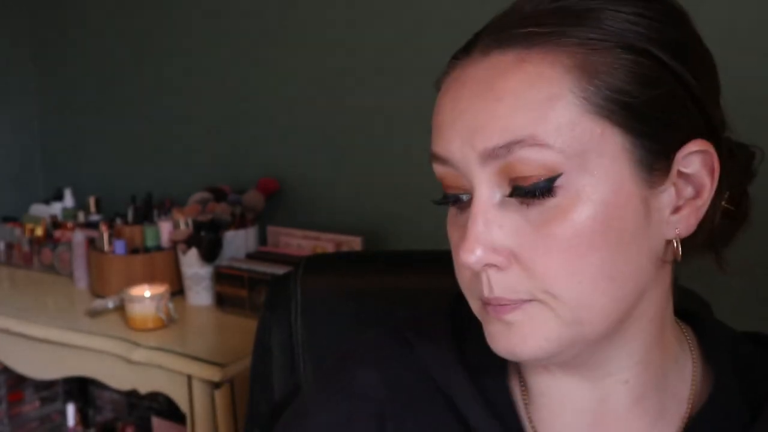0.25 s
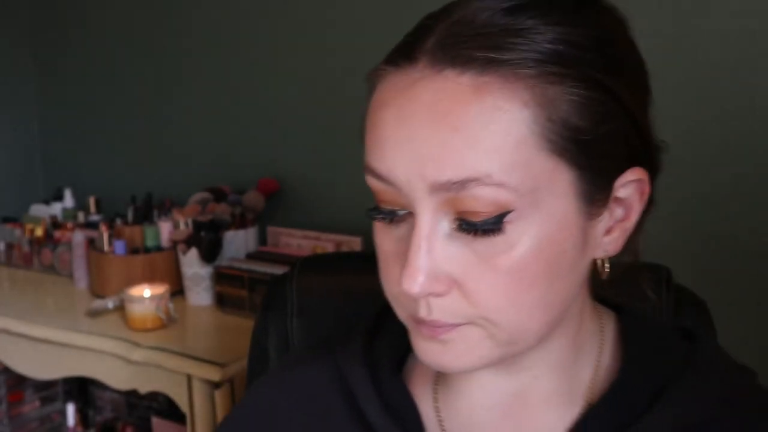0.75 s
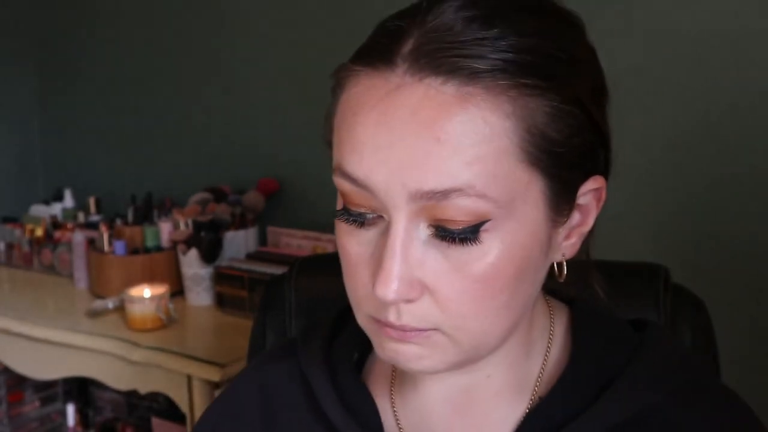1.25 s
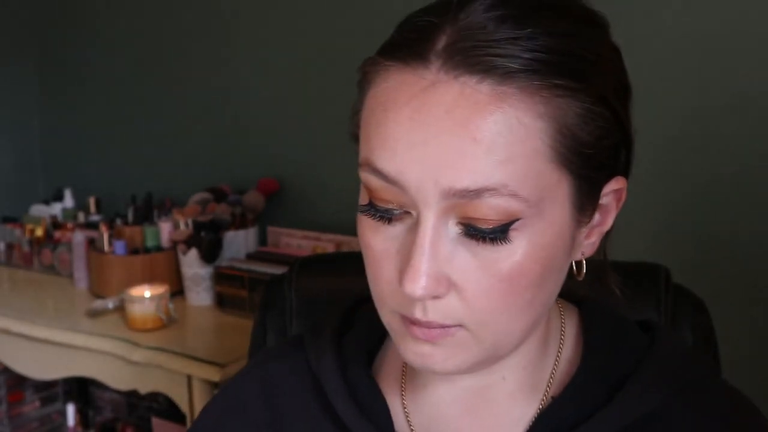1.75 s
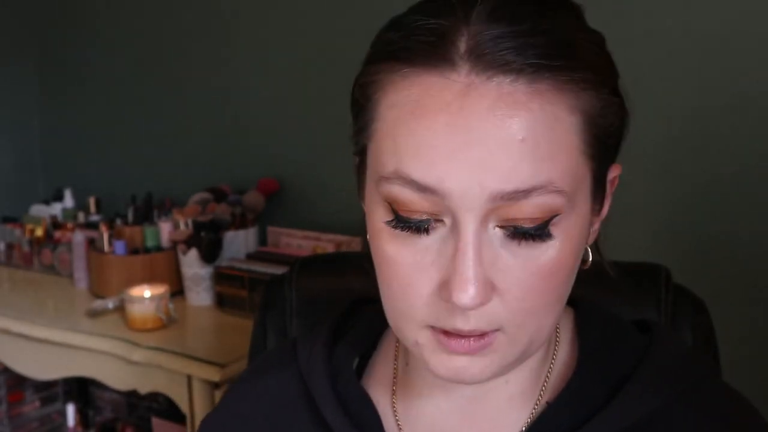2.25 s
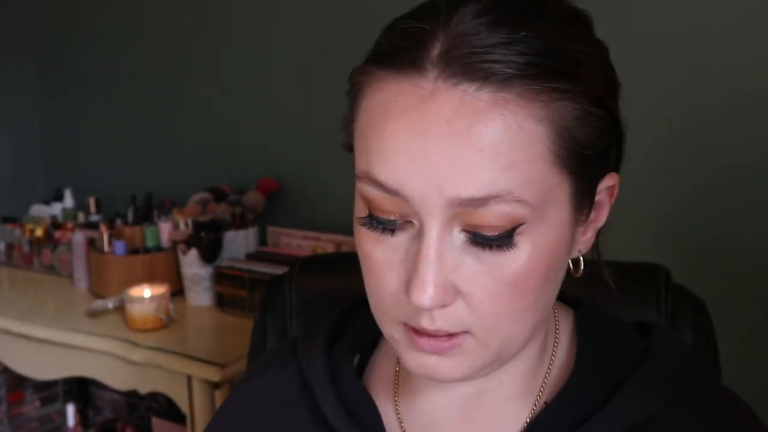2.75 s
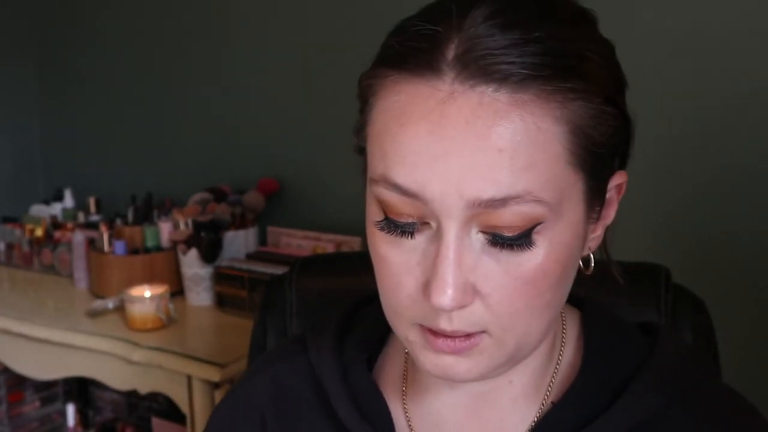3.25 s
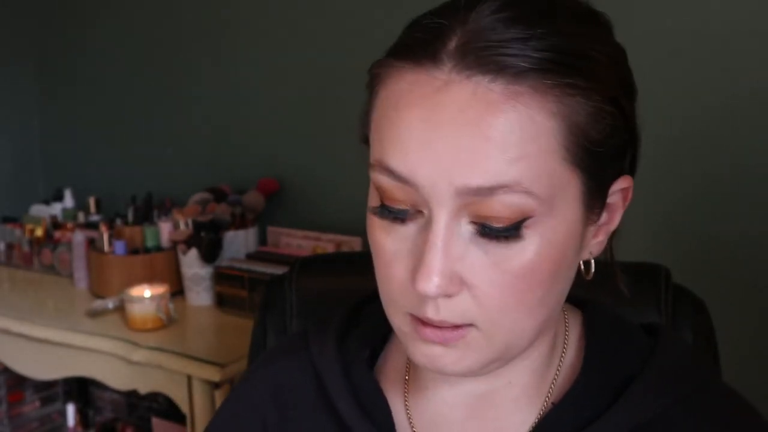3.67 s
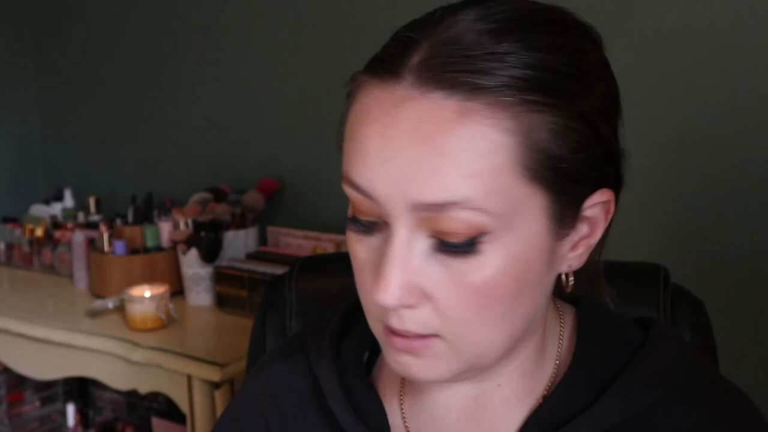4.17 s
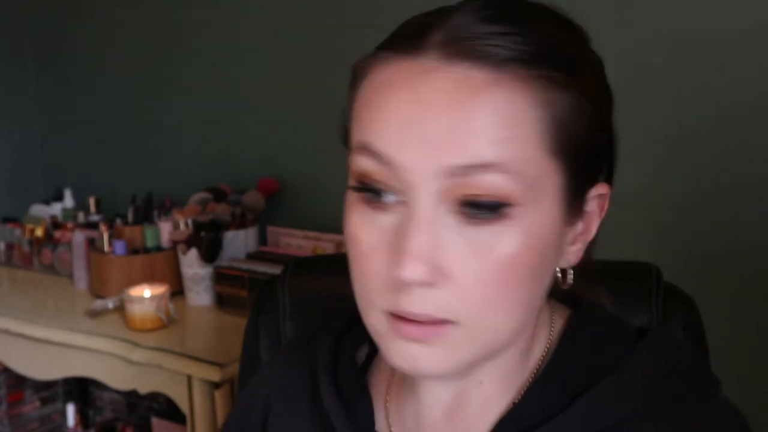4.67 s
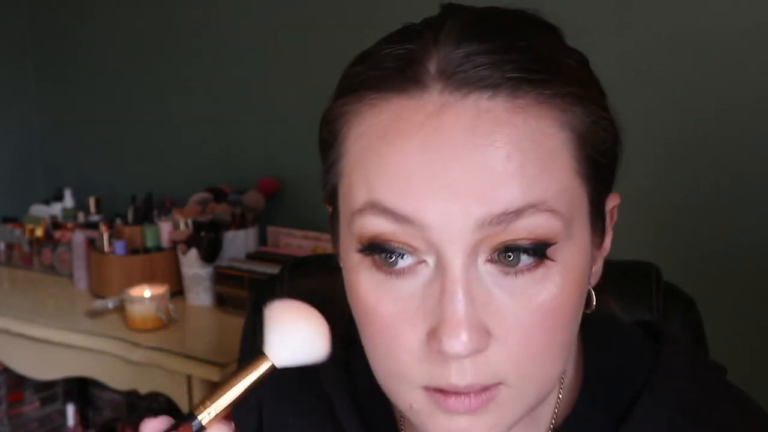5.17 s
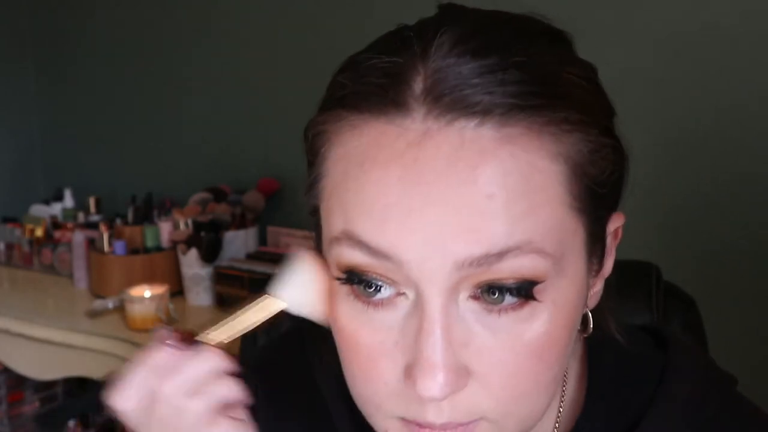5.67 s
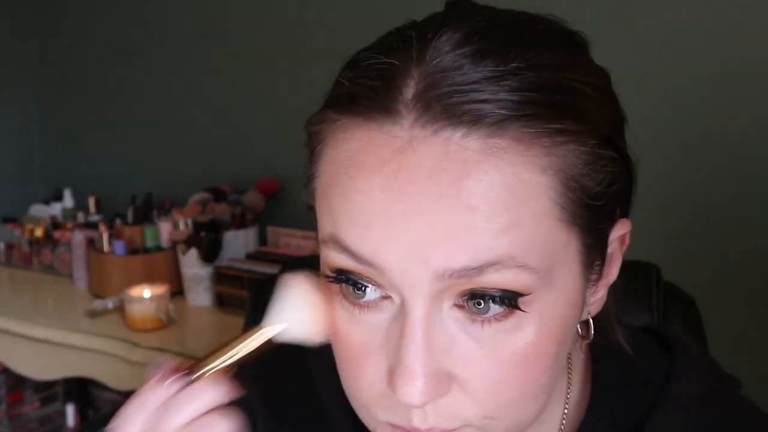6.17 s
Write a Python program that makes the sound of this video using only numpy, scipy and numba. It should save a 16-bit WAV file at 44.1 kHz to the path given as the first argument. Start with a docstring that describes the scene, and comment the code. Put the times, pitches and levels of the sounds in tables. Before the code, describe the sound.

A drawer bumps shut, plastic make-up cases scrape and clatter in a box, one knocks hard on the table, later a compact clacks twice.

```python
"""Small, bare-walled room: someone rummages for make-up beside a camera with two close microphone ports.
A drawer slides shut, plastic cases scrape and clatter in a box, one knocks hard on the table, a compact clacks twice;
then a padded chair shifts, a sleeve rustles among faint squeaks and a brush taps.
Contacts are force bursts and streams of tiny clicks through body resonances, each followed by a diffuse room tail.
Gain control ducks everything, hiss and low hum included, after loud knocks."""
import sys
import numpy as np
from scipy import signal
from scipy.fft import rfft, irfft
from scipy.io import wavfile
from scipy.ndimage import uniform_filter1d, map_coordinates
from numba import njit

SR = 44100
rng = np.random.default_rng(int(sys.argv[2]) if len(sys.argv) > 2 else 0)


def pcm_store(signal):
    """Save signal as 16-bit PCM."""
    levels = np.round(np.clip(np.atleast_2d(signal), -1, 1) * 32767)
    wavfile.write(sys.argv[1], SR, levels.astype(np.int16).T)


N = 283122
SIZE = 32768  # samples per short sound and per impulse response
FREQS = np.maximum(np.arange(SIZE // 2 + 1) * SR / SIZE, 1)
TIME = np.arange(N) / SR
FADE = signal.windows.tukey(2 * SIZE)[SIZE:]
STROKE_LEAD_S = .15
TOP_HZ = 16000

# Steady background spectra: [f/Hz, density/dB], each scaled to its rms level below
AIR = [(15, -47.5), (25, -15.5), (59, -5), (90, -6), (118, -1.5), (146, -3), (438, -8.5), (529, -11),
       (1180, -13.5), (1350, -14.5), (1760, -15.5), (10300, -34), (15000, -60.5)]
HISS_SIDE = [(15, -46.5), (25, -20), (158, -1), (415, 0.5), (488, -2), (558, -3), (673, -2), (3630, -12),
             (8320, -22), (15000, -34)]
AIR_DB, HISS_SIDE_DB, HUM_HZ, HUM_DB = -53.5, -51.5, 122, -60.5
# Microphone response: [f/Hz, gain/dB]
MICROPHONE = [(30, -6.5), (90, 3.5), (11500, -0.5), (12700, -4.5), (13700, -26.5), (16000, -49)]
# Room decay by 60 dB: [f/Hz, time/s]
ROOM_T60 = [(130, 0.46), (260, .52), (510, 0.59), (1020, 0.67), (2050, 0.69), (4100, 0.64), (8200, 0.52),
            (12000, 0.22)]
# Room width: [f/Hz, side over mid/dB]
ROOM_SIDE = [(100, -34), (400, -21.5), (1000, -14), (2200, -12.5), (4000, -2.5), (8000, 3.5), (12000, 5.5),
             (15000, 19.5)]

# Drawer jolts on its runner and hits its stop: [t/s, level/dB, treble/dB, rattle/s]
DRAWER_BUMPS = [(.002, -34, -7, 0.011), (0.046, -35.5, -27, 0.00072), (.103, -19.5, -4.5, 0.0031),
                (.116, -24, 17.5, 0.011)]
# Drawer pushed along its runner: [t/s, level/dB, length/s]
DRAWER_PUSHES = [(0.0011, -29.5, 0.21)]
# Padded chair shifts: [t/s, level/dB, bass/dB, treble/dB]
SOFT_BUMPS = [(4.948, -37, 3, -1), (4.987, -47, 17, -2), (5.115, -49, 3, -6)]
# Brush taps: [t/s, level/dB]
BRUSH_TAPS = [(6.06, -64), (6.302, -64.5)]
# Sleeve brushes by as the arm moves: [t/s, level/dB, length/s]
SLEEVE_SWEEPS = [(5.124, -53.5, 0.03), (5.19, -58.5, 0.077), (5.32, -62.5, .05), (5.48, -56.5, 0.016)]
# Faint rubbing squeaks: [t/s, level/dB, length/s, first f/Hz, last f/Hz, octave above over note/dB]
SQUEAKS = [(4.234, -55, .045, 3885, 3620, -26), (4.424, -53, .03, 3840, 3700, -18),
           (4.953, -59, 0.037, 3870, 3720, -26), (5.112, -56, 0.038, 2000, 2380, -14),
           (5.13, -57, 0.029, 1676, 1850, -10), (5.123, -65, .05, 4560, 4680, -30),
           (5.192, -58, 0.054, 2110, 1830, -21), (5.27, -63, 0.08, 2820, 2920, -16),
           (5.332, -65, 0.045, 1970, 1680, -14), (5.467, -56.5, 0.041, 1720, 2087, -8)]
# Compact scuffs as it is shifted: [t/s, level/dB, rattle/s]
COMPACT_SCUFFS = [(.608, -38, 0.032), (4.213, -46.5, 0.016), (4.2621, -39.5, 0.0034),
                  (4.272, -47.5, 0.0066), (4.298, -45, 0.0036)]
# Compact clacks: [t/s, level/dB, bass/dB, treble/dB, free ring (scales mode dB)]
COMPACT_CLACKS = [(4.4597, -24.5, 7.5, 17.5, 1.016), (4.6226, -26, 1.5, 13.5, 0.83)]
# Nearby surfaces return the clacks: [delay/s, level/dB]
SLAPS = [(.0155, -19), (.031, -8.5)]
# Hand shoves the cases and covers more or less of the box:
# [t/s, level/dB, length/s, hollow f/Hz, hollow gain/dB, rubbed case f/Hz]
CASE_SHOVES = [(0.785, -43, .08, 925, 11.5, 3550), (0.905, -20.5, 0.042, 916, 15, 2730),
               (1.067, -28.5, 0.038, 830, 11.5, 4700), (1.175, -17.5, 0.022, 890, 10, 2020),
               (1.288, -25.5, 0.012, 914, 21, 3970), (1.403, -38.5, 0.072, 960, 6.5, 2880),
               (1.678, -23, 0.04, 915, 15.5, 2920), (1.76, -28, 0.031, 865, 11, 3520),
               (1.822, -31, .05, 900, 25, 3100)]
# Cases clatter: [t/s, level/dB, bass/dB, treble/dB, rattle/s, free ring (0 damped, 1 normal), struck case f/Hz]
CASE_CLACKS = [(0.76, -38.5, -10, -6.5, 0.012, 0.73, 3550), (.895, -20.5, -0.5, 9, 0.04, 0.46, 3680),
               (.975, -25.5, 14, 3, 0.0043, 1, 2750), (1.056, -19, 1.5, 11.5, 0.017, 0.73, 3450),
               (1.153, -16.5, -1, 2, 0.037, 0.59, 2810), (1.586, -29, -18, -3, 0.0029, 0.44, 2450),
               (1.613, -19.5, 2.5, -1, 0.035, 0.86, 2840), (1.663, -16, -2.5, 0, 0.0055, 1.57, 2980),
               (1.744, -24, -5, 1.5, 0.0081, 0.75, 1750)]
# Tube clicks against the cases: [t/s, level/dB, rattle/s]
TUBE_CLICKS = [(.897, -41.5, .004), (1.154, -24.5, 0.018), (1.664, -29.5, 0.003)]
# Small caps tick: [t/s, level/dB, treble/dB, free ring (scales mode dB)]
CAP_TICKS = [(2.303, -55.5, 36, 0.11), (2.4542, -44, -1.5, 0.83), (4.231, -55, -18, 0.64)]
# Short snaps and hollow knocks in a narrow band, some close, some roomy:
# [t/s, level/dB, centre f/Hz, direct over room send/dB]
SNAPS = [(0.012, -39, 2130, -7), (0.0455, -33.5, 1340, 0), (0.1006, -29.5, 3140, -5.5),
         (0.123, -46, 2520, 5), (.737, -68, 9600, -4), (0.935, -43, 4800, -1), (0.991, -44.5, 3000, 4.5),
         (1.064, -44, 4400, 4), (1.1535, -33.5, 2400, -2), (1.182, -42, 3400, 7), (1.219, -38.5, 3000, 4.5),
         (1.404, -54.5, 9000, 6.5), (1.587, -34, 2400, -0.5), (1.614, -36.5, 3300, 5),
         (1.6645, -27.5, 900, 2.5), (1.6643, -33, 2950, 4.5), (1.744, -33, 3600, 2),
         (1.8801, -23.5, 1480, 18.5), (2.4476, -64, 2590, 12), (2.83, -64.5, 2000, 0),
         (4.4592, -46.5, 10400, -2), (4.4592, -33, 1350, -1.5), (4.622, -48.5, 10000, -4),
         (4.6221, -37, 1100, -4)]
# Case put down on the table:
# [t/s, level/dB, treble/dB, rattle/s, direct over room send/dB, free ring (scales mode dB)]
TABLE_KNOCKS = [(1.057, -22, -20, 0.017, -3.5, .27), (1.880, -6, -6.5, 0.0033, 6, 0.78)]

# Stroke envelopes: (rise/(dB/s), sag while it lasts/(dB/s), fall/(dB/s))
PUSH_SHAPE = (600, 43, 420)
SHOVE_SHAPE = (360, 52, 730)
SWEEP_SHAPE = (200, 47, 240)
SQUEAK_SHAPE = (1300, 39, 980)

# Bodies: broad colour [f/Hz, gain/dB], then modes [f/Hz, width/Hz, gain over colour/dB at free ring 1]
DRAWER_RUNNER = ([(40, -12.5), (200, 3.5), (600, -25.5), (1300, 3.5), (2300, 7.5), (4000, -4.5),
                 (11000, -29)], [(172, 87, 7.9), (240, 40, 4), (1670, 65, 1.9), (1872, 140, 7.9)])
DRAWER = ([(40, 3), (110, 9.5), (300, -4.5), (1000, 5.5), (2800, -4.5), (5000, -8), (11000, -20.5)],
          [(172.7, 14, 18), (240.7, 25, 6), (375.6, 45, 14), (580, 36, 9), (779, 28, 7.5), (1622, 125, 9),
          (1960, 56, 11)])
PADDED = ([(40, -3), (110, 8), (220, -1.5), (500, 4), (1200, -3.5), (2500, -8), (5000, -23.5),
          (11000, -30.5)], [(497, 29, 3.1), (2050, 140, 3.8), (3720, 310, 12)])
BRUSH = ([(100, -19), (450, 12), (900, 4), (1400, -15), (5000, -28)], [(470, 106, 7.5), (855, 65, 18)])
SLEEVE = ([(100, -9), (600, -3), (1200, -8), (2000, 6), (3300, -4), (6000, -14), (12000, -31)],
          [(1820, 360, 8.9), (4560, 210, 5)])
SCUFF = ([(60, -7.5), (270, 7.5), (1100, 4.5), (2400, -0.5), (2900, -8), (7000, -24), (11000, -44.5)],
         [(1100, 310, 5.5), (1720, 200, 9.3), (2300, 110, 5.8)])
COMPACT = ([(60, -5), (170, -20), (270, 3), (800, 4.5), (1300, 7), (1800, 5), (2600, -3.5), (4000, -15),
           (7000, -23), (11000, -21)], [(484, 70, 4.9), (564, 117, 19.6), (670, 130, 4.4), (866, 120, 5),
           (1130, 83, 4), (1196, 85, 9.5), (1350, 100, 7.1), (2040, 120, 1.8), (3860, 114, 5.1)])
CASES = ([(40, -25), (85, -7), (130, 5.5), (270, -3.5), (600, -2), (1300, -3), (3000, 2.5), (5000, -2),
         (7500, -6.5), (11500, -12)], [(167.7, 11, 12.3), (345, 27, 5.6), (836, 107, 6.1), (1790, 68, 7),
         (3270, 87, 4), (3550, 110, 5.6), (4900, 77, 4)])
TUBE = ([(200, -16), (1000, -13), (1900, -2.5), (3200, -8), (5000, -5), (11000, -20)], [(2000, 620, 15),
        (2950, 260, 21)])
CAP = ([(100, -22), (1000, -1.5), (2000, 2.5), (4000, 0.5), (7000, -5), (11000, -12)], [(3700, 280, 15.6),
       (3950, 340, 10.2)])
TABLE = ([(40, -27), (130, -7), (250, -7.5), (450, 0), (700, 5), (1250, -4), (2200, 0), (3000, 0),
         (5000, -4), (11000, -18.5)], [(568, 17, 10.5), (636.6, 39, 4.2), (896, 140, 12), (1480, 170, 2.4),
         (1660, 240, 14), (3100, 170, 10), (3930, 110, 3.8)])
# Air in the box, as one mode: (f/Hz, width/Hz, gain/dB)
HOLLOW = (936, 77, 16.8)
# Ring of a single case: (width/Hz, gain/dB)
CASE_NOTE = (110, 9.1)


def undb(db):
    """Decibels to gain."""
    return 10 ** (np.asarray(db) / 20)


def along(points, hz):
    """Read (Hz, value) points on a log-frequency axis."""
    at_hz, value = np.transpose(points)
    return np.interp(np.log(hz), np.log(at_hz), value)


def unit(x):
    """Scale to an rms of one."""
    return x / np.sqrt(np.mean(x ** 2))


def causal(gain):
    """Minimum-phase response with the given gain, by folding the cepstrum."""
    cepstrum = irfft(np.log(gain))
    cepstrum[1:SIZE // 2] *= 2
    cepstrum[SIZE // 2 + 1:] = 0
    return np.exp(rfft(cepstrum))


def colour(points):
    """Minimum-phase response through (Hz, dB) points."""
    return causal(undb(along(points, FREQS)))


def impulse(response):
    """Impulse response, faded to silence at its end."""
    return irfft(response) * FADE


def through(x, response):
    """Pass a sound through a frequency response."""
    return signal.oaconvolve(x, impulse(response))[:len(x)]


def uncoloured(burst, size):
    """Burst spectrum levelled over `size` bins: keeps its scatter in time, loses its own tone."""
    spectrum = rfft(burst)
    power = uniform_filter1d(abs(spectrum) ** 2, size)
    return spectrum * causal(np.maximum(power, 1e-12) ** -.5)


def resonate(body, ring=1):
    """Body response: broad colour lifted by each mode as far as the grip lets it ring."""
    points, modes = body
    response = colour(points)
    for hz, width_hz, gain_db in modes:
        detune = (FREQS / hz - hz / FREQS) * hz / width_hz
        response = response * (1 + (undb(ring * gain_db) - 1) / (1 + 1j * detune))
    return response


def grains(size, per_s=2500, spread_db=3):
    """Tiny contacts at random moments, a few much stronger than the rest."""
    touch = rng.random(size) < per_s / SR
    sign = rng.choice([-1, 1], size)
    strength = undb(spread_db * np.minimum(rng.exponential(size=size), 4))
    return unit(touch * sign * strength)


def wander(span_s):
    """Smooth chance, rms one, that changes about once per span."""
    span = max(int(span_s * SR), 1)
    smooth = uniform_filter1d(rng.standard_normal(SIZE), span, mode="wrap")
    return unit(uniform_filter1d(smooth, span, mode="wrap"))


def place(sound, t_s, direct_db):
    """Start a short sound at its moment; rows: direct sound, room send."""
    out, start = np.zeros(N + 2 * SIZE), SIZE + int(t_s * SR)
    out[start:start + SIZE] = sound
    return np.outer([undb(direct_db), 1], out[SIZE:SIZE + N])


def knock(body, t_s, level_db, rattle_s, direct_db, bass_db=0, treble_db=0, ring=1, contact_s=0.0016,
          rattle_gain=0.094, bass_hz=200, middle_hz=900, treble_hz=5000):
    """One blow: a short noisy contact and a decaying rattle ring the body."""
    t = TIME[:SIZE]
    crack = rng.standard_normal(SIZE) * np.exp(-t / contact_s)  # edges do not land all at once
    rattle = rattle_gain * grains(SIZE) * np.exp(-t / max(rattle_s, 1 / SR))
    force = crack / np.linalg.norm(crack) + rattle
    # heavy blow: more bass; hard blow: more treble
    touch = colour([(bass_hz, bass_db), (middle_hz / 2, 0), (middle_hz, 0), (treble_hz, treble_db)])
    hit = impulse(uncoloured(force, size=90) * resonate(body, ring) * touch)
    hit *= undb(level_db) * np.sqrt(SR / 20 / np.sum(hit ** 2))  # level over 50 ms
    return place(hit, t_s, direct_db)


def stroke(level_db, length_s, shape):
    """Effort of one hand movement: rises to its level, sags while it lasts, falls away."""
    rise, sag, fall = shape
    t = TIME[:SIZE] - STROKE_LEAD_S
    drop_db = rise * np.maximum(-t, 0) + sag * np.clip(t, 0, length_s) + fall * np.maximum(t - length_s, 0)
    return undb(level_db - drop_db)


def slide(body, t_s, level_db, length_s, shape, per_s, spread_db, direct_db, jerk_db, drift):
    """Jerky stroke: dense catch-and-slip clicks ring the body; pitch drifts as the grip shifts."""
    response = resonate(body)
    response = response / np.sqrt(np.mean(abs(response) ** 2))
    jerks = unit(undb(jerk_db * wander(span_s=0.018)))
    effort = stroke(level_db, length_s, shape) * jerks
    scrape = through(effort * grains(SIZE, per_s, spread_db), response)
    # pitch drift by a wandering read position, pinned at the stroke's start
    slip = np.cumsum(drift * wander(span_s=0.0236))
    read_at = np.arange(SIZE) + slip - slip[int(STROKE_LEAD_S * SR)]
    scrape = map_coordinates(scrape, [read_at])
    return place(scrape, t_s - STROKE_LEAD_S, direct_db)


def background():
    """Room air and a low hum in mid, microphone hiss in side: shaped noise and a sine."""
    air = undb(AIR_DB) * unit(through(rng.standard_normal(N), colour(AIR)))
    hiss = undb(HISS_SIDE_DB) * unit(through(rng.standard_normal(N), colour(HISS_SIDE)))
    hum = undb(HUM_DB) * unit(np.sin(2 * np.pi * HUM_HZ * TIME))
    return np.array([air + hum, hiss])


def room_tail(early_db, build_s=0.0027, early_s=0.056):
    """Wall reflections: strong early, then a diffuse tail with its own decay in each octave."""
    t, noise, tail = TIME[:SIZE], rfft(rng.standard_normal(SIZE)), 0
    octave = np.round(np.log2(np.maximum(FREQS, 100)))
    for k in np.unique(octave):
        decay = np.exp(-np.log(1000) * t / along(ROOM_T60, 2 ** k))
        tail = tail + irfft(noise * (octave == k)) * decay
    build = 1 - np.exp(-(t / build_s) ** 2)
    early = undb(early_db * np.exp(-t / early_s))
    return uncoloured(tail * build * early, size=24)


def room(source, gap_s, early_db, port_lag_samples=1.36):
    """One place in the room as mid and side: the ports share the bass and differ in the treble."""
    direct, send = source
    late = np.pad(send, (int(abs(gap_s) * SR), 0))[:N]  # first reflection has further to go
    mid = direct + through(late, room_tail(early_db))
    side_tail = through(late, room_tail(early_db) * colour(ROOM_SIDE))
    side = port_lag_samples * np.gradient(direct) + side_tail
    return np.array([mid, side])


def squeak(t_s, level_db, length_s, first_hz, last_hz, octave_db, waver=0.0213, direct_db=-1.0):
    """Fast stick-slip: a rough, gliding note with its octave."""
    glide_hz = np.interp(TIME[:SIZE] - STROKE_LEAD_S, [0, length_s], [first_hz, last_hz])
    phase = 2 * np.pi * np.cumsum(glide_hz * (1 + waver * wander(span_s=.0015))) / SR
    note = unit(np.sin(phase) + undb(octave_db) * np.sin(2 * phase))
    return place(note * stroke(level_db, length_s, SQUEAK_SHAPE), t_s - STROKE_LEAD_S, direct_db)


def seat():
    """Padded thumps of the chair, sleeve friction, stick-slip squeaks and soft brush taps."""
    chair = sum(knock(PADDED, t_s, level_db, rattle_s=0.06, direct_db=-6.5, bass_db=bass_db,
                      treble_db=treble_db, ring=0.31)
                for t_s, level_db, bass_db, treble_db in SOFT_BUMPS)
    brush = sum(knock(BRUSH, t_s, level_db, rattle_s=0.0088, direct_db=5.5) for t_s, level_db in BRUSH_TAPS)
    sleeve = sum(slide(SLEEVE, *sweep, SWEEP_SHAPE, per_s=860, spread_db=4.5, direct_db=5.0,
                       jerk_db=2.0, drift=.06)
                 for sweep in SLEEVE_SWEEPS)
    squeaks = sum(squeak(*row) for row in SQUEAKS)
    return chair + brush + sleeve + squeaks


def drawer():
    """Drawer scrapes along its runner and its body rings as it bumps shut."""
    bumps = sum(knock(DRAWER, t_s, level_db, rattle_s, direct_db=-5.0, bass_db=0.5,
                      treble_db=treble_db, ring=1.0, rattle_gain=0.16)
                for t_s, level_db, treble_db, rattle_s in DRAWER_BUMPS)
    pushes = sum(slide(DRAWER_RUNNER, *push, PUSH_SHAPE, per_s=470, spread_db=3.0, direct_db=0,
                       jerk_db=2.0, drift=.01)
                 for push in DRAWER_PUSHES)
    return bumps + pushes


def compact():
    """Compact scuffs dully while held; its clacks ring and nearby surfaces answer."""
    scuffs = sum(knock(SCUFF, t_s, level_db, rattle_s, direct_db=-7.0, contact_s=0.0034)
                 for t_s, level_db, rattle_s in COMPACT_SCUFFS)
    clacks = sum(knock(COMPACT, t_s, level_db, rattle_s=0.0051, direct_db=-6.5, bass_db=bass_db,
                       treble_db=treble_db, ring=ring, contact_s=0.0029)
                 for t_s, level_db, bass_db, treble_db, ring in COMPACT_CLACKS)
    slaps = sum(undb(level_db) * np.roll(clacks, int(delay_s * SR), axis=1) for delay_s, level_db in SLAPS)
    return scuffs + clacks + slaps


def snaps(skirt_db=-24, top_db=-38):
    """Short snaps and hollow knocks: a brief noisy contact through one narrow band."""
    hits = 0
    for t_s, level_db, hz, direct_db in SNAPS:
        points = [(hz / 3, skirt_db), (hz, 0), (hz * 2, skirt_db), (hz * 6, top_db)]
        body = points, [(hz, hz / 2, 6)]
        hits = hits + knock(body, t_s, level_db, rattle_s=0.00067, direct_db=direct_db, contact_s=0.00047)
    return hits


def table():
    """A case rings the table top on landing; short snaps and hollow knocks join in."""
    knocks = sum(knock(TABLE, t_s, level_db, rattle_s, direct_db, bass_db=-1, treble_db=treble_db, ring=ring)
                 for t_s, level_db, treble_db, rattle_s, direct_db, ring in TABLE_KNOCKS)
    return snaps() + knocks


def box(case_hz, hollow=HOLLOW):
    """Box of cases as a body: walls, hollow and the one case touched."""
    points, modes = CASES
    return points, modes + [hollow, (case_hz, *CASE_NOTE)]


def rummage():
    """Plastic cases scrape over each other; the box's hollow shifts as the hand moves in it."""
    scrapes = 0
    for t_s, level_db, length_s, hollow_hz, hollow_db, case_hz in CASE_SHOVES:
        body = box(case_hz, (hollow_hz, HOLLOW[1], hollow_db))
        scrapes = scrapes + slide(body, t_s, level_db, length_s, SHOVE_SHAPE, per_s=260, spread_db=2.0,
                                  direct_db=-1.5, jerk_db=3, drift=.03)
    return scrapes


def clatter():
    """Cases, a tube and small caps strike one another and ring."""
    cases = sum(knock(box(case_hz), t_s, level_db, rattle_s, direct_db=-12.0, bass_db=bass_db,
                      treble_db=treble_db, ring=ring)
                for t_s, level_db, bass_db, treble_db, rattle_s, ring, case_hz in CASE_CLACKS)
    tube = sum(knock(TUBE, t_s, level_db, rattle_s, direct_db=1.5, ring=5.2)
               for t_s, level_db, rattle_s in TUBE_CLICKS)
    caps = sum(knock(CAP, t_s, level_db, rattle_s=0.0012, direct_db=-6.0, treble_db=treble_db, ring=ring)
               for t_s, level_db, treble_db, ring in CAP_TICKS)
    return cases + tube + caps


def scene():
    """Background plus handled things, each place with its own reflections, as left and right."""
    handled = room(drawer() + seat(), gap_s=.0005, early_db=7.5)
    handled += room(compact(), gap_s=0.0044, early_db=10.0)
    handled += room(table(), gap_s=.004, early_db=9.5)
    handled += room(rummage(), gap_s=0.00092, early_db=8)
    handled += room(clatter(), gap_s=.0005, early_db=7.0)
    picked_up = np.array([through(x, colour(MICROPHONE)) for x in handled])
    mid, side = background() + picked_up
    return np.array([mid + side, mid - side])


@njit
def follow(x, attack, release):
    """Level follower: rises fast, falls slowly; coefficients per sample."""
    out, level = np.empty(len(x)), 0.
    for i in range(len(x)):
        level += (x[i] - level) * (attack if x[i] > level else release)
        out[i] = level
    return out


def record(dry, threshold_db=-17, ratio=2.22, attack_s=0.015, release_s=0.6):
    """Gain control ducks after loud knocks, too late for the first peak, which clips softly."""
    level = follow(abs(dry).max(axis=0), 1 / (attack_s * SR), 1 / (release_s * SR))
    gain = np.maximum(level / undb(threshold_db), 1) ** (1 / ratio - 1)
    ducked = dry * gain
    clipped = ducked / (1 + (ducked / .88) ** 6) ** (1 / 6)  # ceiling .88 of full scale
    low_pass = signal.ellip(10, .2, 90, TOP_HZ, fs=SR, output="sos")
    return signal.sosfilt(low_pass, clipped)


dry = scene()
out = record(dry)
pcm_store(out)
```